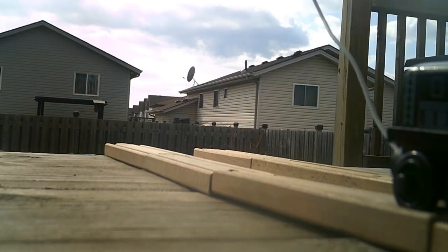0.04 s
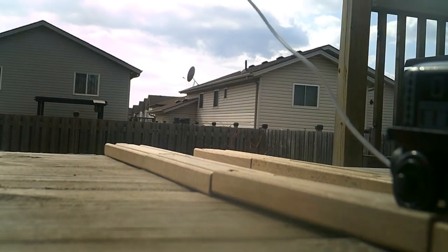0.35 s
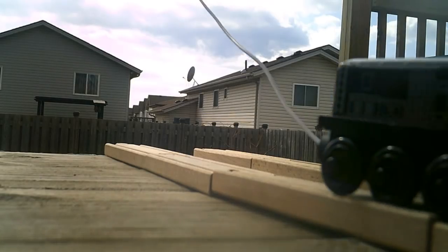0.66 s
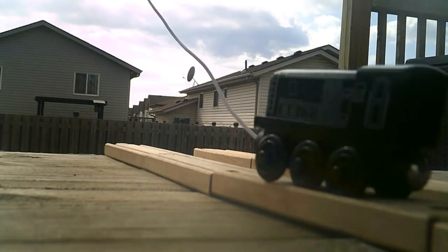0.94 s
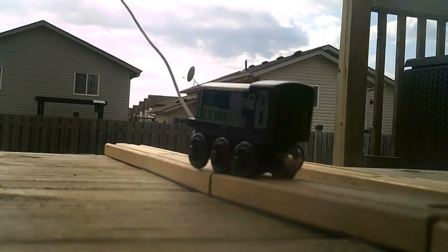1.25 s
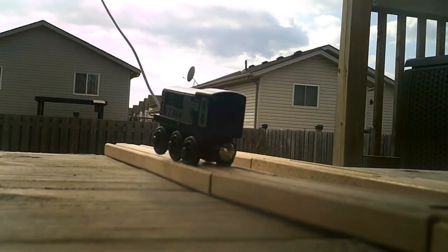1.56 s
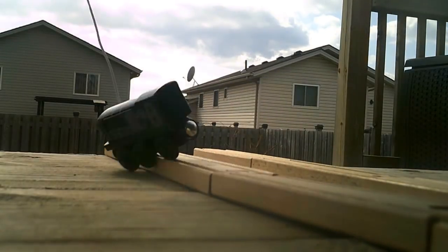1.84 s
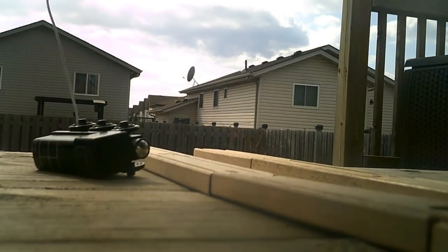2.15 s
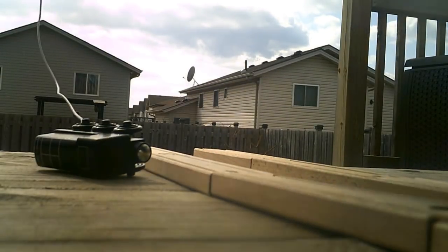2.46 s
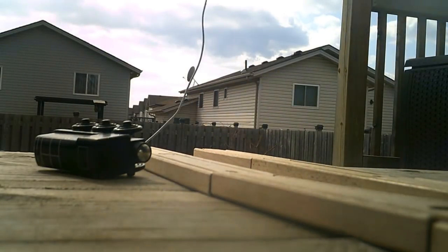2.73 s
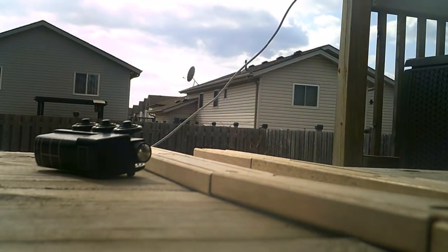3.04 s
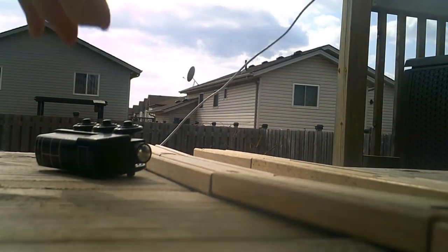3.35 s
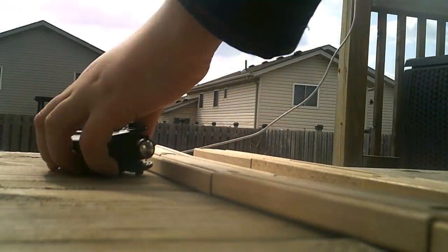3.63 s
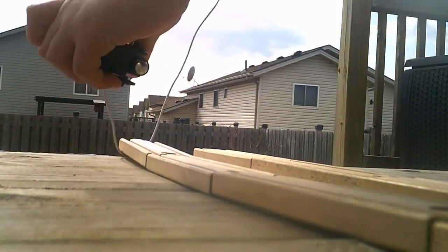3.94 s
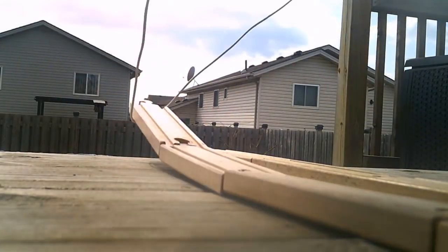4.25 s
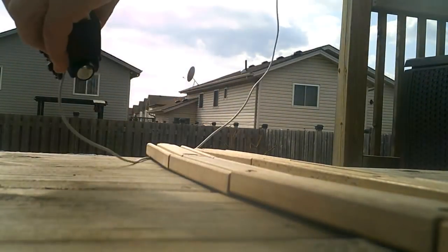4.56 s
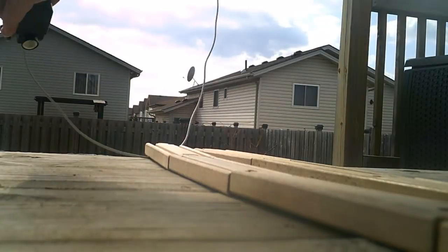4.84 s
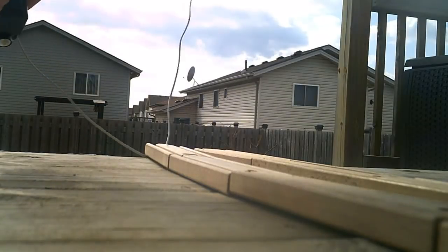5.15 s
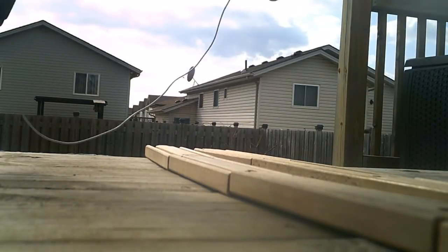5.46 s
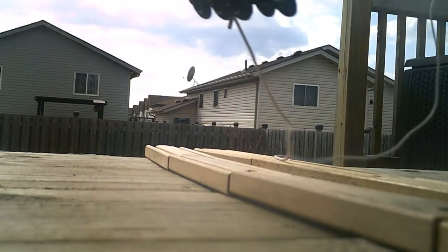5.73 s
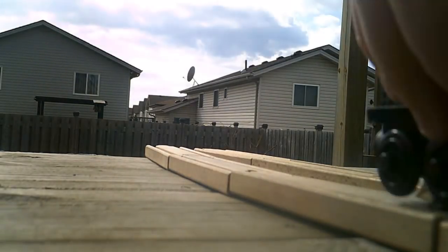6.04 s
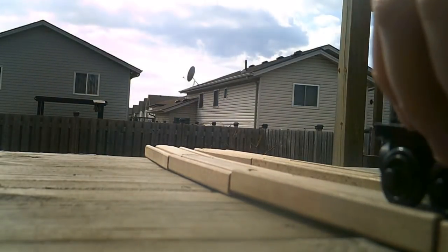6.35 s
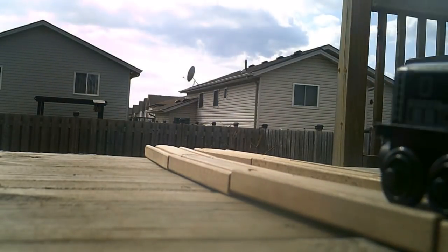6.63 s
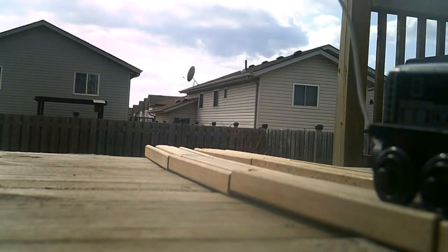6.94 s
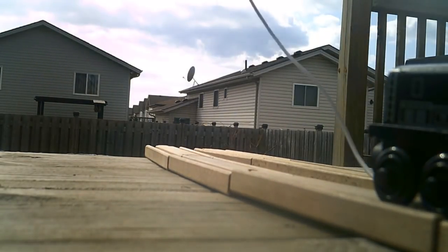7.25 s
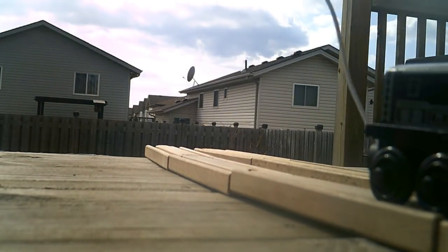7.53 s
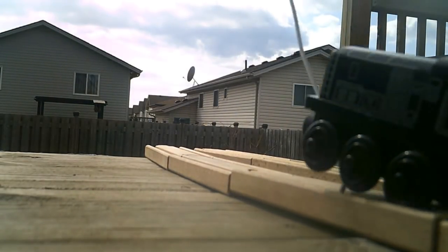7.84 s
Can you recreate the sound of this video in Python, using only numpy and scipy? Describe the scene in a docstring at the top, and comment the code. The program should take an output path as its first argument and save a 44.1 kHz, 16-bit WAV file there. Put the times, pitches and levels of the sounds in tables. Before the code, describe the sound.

Close to a small microphone on a garden deck, toy train wheels rumble and rattle over wooden track. The toy falls with loud, slightly distorted knocks, and a cord groans over an edge. Scattered wooden clacks, rubs and tiny metal clinks follow as it is lifted and put back, and it briefly starts rolling again. Light wind and a low outdoor hum continue underneath.

```python
"""A garden deck, close up on a small camera's microphone, with light wind and a distant murmur.
A wooden toy engine, pulled by a cord, scrapes and rumbles along loose track slats. At two seconds
it tumbles off the end: the boards thud underneath and the hardest knocks overload the microphone.
The cord creaks over an edge, and the engine is picked up while the slats clack back down.
Fingers settle it on the track, and just before the end it is set rolling again."""
import sys
import numpy as np
from scipy import signal
from scipy.fft import rfft, irfft, next_fast_len
from scipy.io import wavfile
from scipy.ndimage import map_coordinates

SR = 44100
rng = np.random.default_rng(int(sys.argv[2]) if len(sys.argv) > 2 else 0)


def wav_record(signal):
    """Record a signal, one row per channel, as 16-bit PCM in the file named by sys.argv[1]."""
    frames = np.transpose(np.atleast_2d(signal))
    bounded = np.clip(frames, -1, 1)
    # unit amplitude maps onto the largest positive 16-bit level
    quanta = np.round(bounded * 32767).astype(np.int16)
    wavfile.write(sys.argv[1], SR, quanta)


N = 352359
TIME = np.arange(N) / SR

# resonances of the engine's hollow body: (frequency [Hz], width [Hz], level [dB])
BODY_MODES = [(1061, 28, 2.5), (1388, 28, -10.5), (1765, 9.1, -12.5), (2160, 97, -21), (2560, 43, -12),
              (3430, 70, -18.5)]
# spectrum of sliding on wood, also of the outdoor rustle: (frequency [Hz], level [dB])
SLIDE_SPECTRUM = [(300, -16), (700, 8.5), (1080, 10), (1300, 0.5), (1800, 4), (2600, -2.5), (3400, -9),
                  (4300, -19.5), (5200, -28), (7000, -38)]
# spectrum of fine hiss: (frequency [Hz], level [dB])
HISS_SPECTRUM = [(2500, -53), (4200, 5.5), (5200, -6), (6700, 10.5), (7800, 6), (8500, -36.5)]


def amp(db):
    """Decibels to gain."""
    return 10 ** (np.asarray(db) / 20)


def unit(x):
    """Scale to rms 1."""
    return x / np.sqrt(np.mean(x ** 2) + 1e-20)


def fade(t, t60):
    """Exponential decay by 60 dB in t60 seconds."""
    return np.exp(-np.log(1000) * t / np.maximum(t60, 1e-3))


def add(track, s, sound):
    """Mix a sound into a track at s seconds."""
    room = track[max(round(s * SR), 0):][:len(sound)]
    room += sound[:len(room)]


def wobble(rate):
    """A smooth random curve with rate knots a second."""
    return map_coordinates(rng.standard_normal(int(N * rate / SR) + 4), [TIME * rate])


def swell(rows):
    """A gain through (time [s], level [dB]) points, dying away outside them."""
    s, db = np.transpose(rows)
    outside = np.abs(TIME - np.clip(TIME, s[0], s[-1]))
    return amp(np.interp(TIME, s, db)) * fade(outside, 0.11)


def filtered(x, response):
    """x through a response given as a function of frequency."""
    size = next_fast_len(len(x) + 4096)
    return irfft(rfft(x, size) * response(np.fft.rfftfreq(size, 1 / SR)), size)[:len(x)]


def softened(x, edge_hz, order):
    """x without its treble above edge_hz."""
    return filtered(x, lambda hz: 1 / (1 + (hz / edge_hz) ** order))


def coloured(x, spectrum):
    """x shaped by a (frequency [Hz], level [dB]) spectrum, at rms 1."""
    f, db = np.transpose(spectrum)
    return unit(filtered(x, lambda hz: amp(np.interp(np.log(hz + 1), np.log(f + 1), db))))


def resonate(x, modes):
    """x through a bank of resonances of alternating sign, at rms 1."""
    def response(f):
        return sum((-1) ** k * amp(db) * 1j * f * width / (hz * hz - f * f + 1j * f * width)
                   for k, (hz, width, db) in enumerate(modes))
    return unit(filtered(x, response))


def noise(spectrum):
    """Steady noise with the given spectrum, at rms 1."""
    return coloured(rng.standard_normal(N), spectrum)


def grains(rate, spread_db):
    """Tiny random contacts of unequal force, rate a second."""
    contacts = (rng.random(N) < rate / SR) * rng.standard_normal(N)
    return unit(contacts * amp(spread_db * rng.standard_normal(N) / 2))


def outdoors(wind_db=-38.5, rustle_db=-61.5, hiss_db=-80):
    """Wind on the microphone, a distant murmur, faint rustle and hiss, and a brief high insect buzz."""
    # spectra of the wind and of the murmur: (frequency [Hz], level [dB])
    wind_spectrum = [(10, -12.5), (25, 2.5), (42, -4), (70, -6.5), (130, -16), (300, -26.5), (900, -96)]
    murmur_spectrum = [(60, -4.5), (180, -1), (400, 4), (600, 3.5), (850, 4), (1120, -5), (1300, -12),
                       (2400, -25), (3500, -24), (4200, -46.5)]
    # rise and fall of the murmur: (time [s], level [dB])
    murmur_levels = [(0, -45.5), (.3, -52), (1.2, -44), (2.3, -46.5), (4.2, -43.5), (4.5, -51), (5.6, -49),
                     (6.45, -43), (7.3, -47.5)]
    gusts = amp(wind_db + 1.9 * wobble(8)) * noise(wind_spectrum)
    murmur_db = np.interp(TIME, *np.transpose(murmur_levels)) + 0.42 * wobble(4.97)
    murmur = amp(murmur_db) * noise(murmur_spectrum)
    rustle = amp(rustle_db) * noise(SLIDE_SPECTRUM) + amp(hiss_db) * noise(HISS_SPECTRUM)
    buzz = noise([(5500, -38.5), (6100, -26), (6550, -24), (7100, -62)])
    return gusts + murmur + rustle + swell([(.18, -69), (.85, -71)]) * buzz


def stroke(s, hold, ramp, ramp_db=28.5, sag_db_per_s=19, release_ratio=1.03):
    """Gain of one sliding stroke: it swells until s, eases off while held, and lets go."""
    before = np.maximum(s - TIME, 0)
    held = np.clip(TIME - s, 0, hold)
    after = np.maximum(TIME - s - hold, 0)
    return amp(-ramp_db * (before + after / release_ratio) / ramp - sag_db_per_s * held)


def rubbing(body_db=-3):
    """Wheel flanks, cord and hand slide on wood: tiny slips rasp and ring in it, with hiss on top."""
    # sliding strokes: (time of full pressure [s], hold [s], ramp [s], level [dB], relative hiss [dB])
    strokes = [(0.0, 0.07, 0.58, -55, -23), (0.802, 0.029, 0.18, -42.5, -18.5),
               (1.193, .06, 0.099, -34.5, -16.5), (1.269, 0.046, 0.11, -24, -21.5),
               (2.451, .17, 0.11, -43, -30), (2.77, 0.037, 0.17, -37, -22),
               (2.853, 0.31, .12, -51.5, -19.5), (3.297, 0.28, 0.09, -46, -22.5),
               (3.887, 0.17, 0.39, -44.5, -20.5), (5.058, 0.2, .12, -50, -27), (5.49, 0.18, 0.83, -56, -41),
               (5.766, 0.049, 0.16, -42.5, -22.5), (5.95, 0.014, 0.067, -44, -21.5),
               (6.479, 0.45, 0.13, -42.5, -23), (7.002, 0.14, 0.044, -37.5, -16.5),
               (7.38, 0.078, 0.21, -44.5, -25.5), (7.603, 0.059, .13, -49.5, -22.5)]
    rub_gain, hiss_gain = np.zeros(N), np.zeros(N)
    for s, hold, ramp, db, hiss_db in strokes:
        pressure = amp(db) * stroke(s, hold, ramp)
        rub_gain = np.maximum(rub_gain, pressure)
        hiss_gain = np.maximum(hiss_gain, amp(hiss_db) * pressure)
    slips = rng.standard_normal(N) * amp(0.87 * wobble(90))
    body = resonate(grains(rate=5300, spread_db=10), BODY_MODES)
    rasp = unit(coloured(slips, SLIDE_SPECTRUM) + amp(body_db) * body)
    return rub_gain * rasp + amp(1) * hiss_gain * noise(HISS_SPECTRUM)


def deck_thuds(t60=0.25, overtone_ratio=1.97, overtone_db=-7, attack_s=0.0057):
    """A deck board bounces in its lowest mode, with a shorter overtone."""
    # heavy pushes on the boards: (time [s], relative level [dB], board pitch [Hz])
    pushes = [(0.004, -19, 42.7), (1.817, -9, 57.8), (1.858, -9.5, 43), (2.7, -21.5, 125), (2.735, -20, 62),
              (2.848, -9.5, 45), (3.44, -6, 41.4), (3.445, -17, 174.6), (3.521, -22.5, 92.4),
              (6.965, -24, 108.5)]
    track, t = np.zeros(N), np.arange(SR // 2) / SR
    for s, db, board_hz in pushes:
        phase = 2 * np.pi * board_hz * t
        overtone = amp(overtone_db) * np.sin(overtone_ratio * phase) * fade(t, 0.12)
        swing = np.sin(phase) * fade(t, t60) + overtone
        add(track, s, -amp(db + 4) * swing * (1 - np.exp(-t / attack_s)))
    return track


def knock(thud_db, crack_db, t60, pitch_hz, focus_db=8, focus_octaves=0.14,
          tail_db=-22, tail_t60=0.45, attack_s=0.00056):
    """One blow on wood: ringing slat modes, a dense burst of overtones, and the deck's longer answer."""
    # modes of slats and deck boards: (frequency [Hz], level [dB], t60 [s])
    slat_modes = [(91.5, -13, 0.99), (174.4, -9, 0.94), (257.3, -2, 0.19), (342.5, -18, 0.28),
                  (437.7, -1, 0.2), (494.5, -6.5, 0.14), (662, -0.5, 0.12), (746, 5.5, 0.07),
                  (902, 0, 0.066), (1045, 1, 0.055), (1104, -7.5, 0.21), (1355, -22, 0.25),
                  (1447, -13, 0.11), (1650, -21, 0.06), (1826, -12.5, 0.075), (2126, -16.5, 0.055),
                  (2415, -23, 0.27), (2516, -29, 0.08), (2590, -22.5, 0.094), (3340, -19, 0.05)]
    # spectrum of the dense overtones: (frequency [Hz], level [dB])
    clack_spectrum = [(60, -45), (170, 5.5), (300, 3.5), (450, -1), (750, -0.5), (1100, -7.5), (1300, -19),
                      (1900, -12), (2700, -21.5), (3600, -36), (4800, -42), (7500, -46)]
    t = np.arange(SR // 3) / SR
    onset = t < .015

    def favour(hz):
        """The place struck favours the modes around one pitch."""
        return amp(focus_db * np.exp(-.5 * (np.log2((hz + 1) / pitch_hz) / focus_octaves) ** 2))

    ring = np.zeros(len(t))
    for hz, db, mode_t60 in slat_modes:
        strength = favour(hz) * amp(db + rng.normal(0, 2.4)) * rng.choice([-1, 1])
        detuned_hz = hz * (1 + rng.normal(0, 0.0044))
        ring += strength * np.sin(2 * np.pi * detuned_hz * t) * fade(t, mode_t60)
    ring *= fade(t, 6 * t60)  # a blow that stays in contact damps the ring
    ring = amp(1) * ring / np.std(ring[onset])
    overtones = coloured(filtered(rng.standard_normal(len(t)), favour), clack_spectrum)
    snap_db = -13 + 1.2 * min(crack_db, -6)  # only hard contacts snap in the treble
    blow = amp(snap_db) * rng.standard_normal(len(t)) * fade(t, 0.016)
    # low overtones outlast high ones
    registers = [(400, "low", thud_db, 1.5), ([400, 1300], "band", 0, 1), (1400, "high", crack_db, .6)]
    for edge_hz, kind, db, stretch in registers:
        decay = fade(t, t60 * stretch) + amp(tail_db) * fade(t, tail_t60 * stretch)
        struck = (ring + 1.88 * overtones * decay) * (1 - np.exp(-t / attack_s))
        band = signal.sosfilt(signal.butter(4, edge_hz, kind, fs=SR, output="sos"), struck)
        blow += amp(db) * band / np.std(band[onset])
    return blow


def taps(t60=0.064, even_hz=634, thud_db_per_octave=30.5):
    """Wheels, fingers and shifting slats tap lightly; the deeper the note, the more the deck thuds."""
    # light contacts: (time [s], level [dB], favoured pitch [Hz], relative crack [dB])
    contacts = [(0.515, -37, 570, -30), (0.546, -40, 620, -13), (0.641, -37.5, 537, -11),
                (1.758, -37.5, 520, -16), (1.815, -31.5, 685, -14.5), (1.931, -40.5, 520, -9.5),
                (2.904, -44, 790, -3), (3.152, -38.5, 647, -12), (3.358, -41.5, 595.4, -8),
                (3.595, -51.5, 425, -29), (3.749, -34.5, 766, -23), (4.012, -45.5, 454, -1.5),
                (4.214, -36, 469.3, -37), (4.686, -43.5, 530, -20), (4.711, -36.5, 670, -25),
                (4.804, -39.5, 633, -21), (4.828, -35.5, 714, -24), (5.0, -38.5, 570, -40),
                (5.792, -41.5, 585, -9), (6.404, -37, 780, -11.5), (7.734, -38.5, 522, -20),
                (7.807, -41, 600, -13), (7.843, -41.5, 930, -0.5)]
    track = np.zeros(N)
    for s, db, pitch_hz, crack_db in contacts:
        thud_db = thud_db_per_octave * np.log2(even_hz / pitch_hz)
        add(track, s, amp(db) * knock(thud_db, crack_db, t60, pitch_hz))
    return track


def rolling():
    """Gain that follows how hard the wheels roll."""
    # two runs along the track, each a list of (time [s], relative level [dB])
    runs = [
        [(0.52, -31), (0.618, -37), (0.648, -27.5), (0.704, -41.5), (0.85, -35.5), (1.192, -29), (1.778, -35.5),
         (1.8, -36)],
        [(7.7, -42), (7.742, -45), (7.758, -36.5), (7.91, -32)],
    ]
    return sum(swell(run) for run in runs)


def wheels(rumble_db=1.7, rattle_db=-26, rough_at_s=1.14, rough_width_s=0.21, rough_db=17):
    """Wheels bump over the grain: the slats rumble and the hollow body rattles."""
    # resonances of the track: (frequency [Hz], width [Hz], level [dB])
    track_modes = [(166.2, 21.3, 0), (259.5, 43.4, 1.5), (375, 36, -9.5), (437, 11, 0.5), (568, 100, -13.5),
                   (721, 75, -10.5)]
    bumps = grains(rate=1100, spread_db=0.5) * amp(3.1 * wobble(40))
    # wood passes only the slow part of each bump, the heavy track less than the light body
    rumble = resonate(softened(bumps, edge_hz=950, order=8), track_modes)
    rattle = resonate(softened(bumps, edge_hz=3000, order=8), BODY_MODES)
    # a rough stretch of track shakes the body harder
    shake_db = rough_db * np.exp(-.5 * ((TIME - rough_at_s) / rough_width_s) ** 2)
    return rolling() * (amp(rumble_db) * rumble + amp(rattle_db + shake_db) * rattle)


def axle_ticks(per_second=36, relative_db=-31, spread_db=2):
    """The axles click softly in their slots at random moments while the wheels turn."""
    # resonances of the slots: (frequency [Hz], width [Hz], level [dB])
    slot_modes = [(1840, 400, -4.5), (2680, 130, -0.5), (3690, 184, -6.5)]
    clicks = (rng.random(N) < per_second / SR) * amp(spread_db * rng.standard_normal(N))
    return amp(relative_db) * rolling() * resonate(softened(clicks, edge_hz=3700, order=16), slot_modes)


def steel_clinks(t60=0.055):
    """Steel axles and coupling magnets touch and ring briefly in clusters of close modes."""
    # steel contacts: (time [s], relative level [dB])
    contacts = [(0.5677, -39.5), (0.6419, -49), (1.5744, -52), (1.7659, -46), (1.9724, -24), (2.016, -29),
                (2.059, -40), (3.447, -16.5), (3.528, -21), (4.239, -33.5), (5.146, -38), (5.176, -34),
                (6.149, -18.5), (6.358, -43), (6.3984, -41), (7.929, -22)]
    # mode clusters: (frequency [Hz], width [Hz], level [dB])
    clusters = [(3660, 130, 0), (2720, 130, -5), (6800, 1500, -18)]
    track, t = np.zeros(N), np.arange(SR // 8) / SR
    for s, db in contacts:
        ring = resonate(rng.standard_normal(len(t)), clusters)
        add(track, s, amp(db - 9) * ring * fade(t, t60))
    return track


def landings(corner_db=-12.5, shortest_s=.005, flight_ratio=0.98, dulling_db=7):
    """Engine and slats land hard: a corner may touch first, and two duller bounces may follow the blow."""
    # landings: (time [s], level [dB], relative thud [dB], relative crack [dB], t60 [s],
    # favoured pitch [Hz], lead of the corner [s], first flight [s], loss at the first bounce [dB])
    blows = [(1.98, -5.5, -10, -14.5, 0.023, 474, .011, .007, 7.5),
             (2.029, -14, -5.5, -6.5, 0.027, 514, .014, .013, 3.5),
             (3.446, -13.5, -7.5, -9, 0.092, 764, 0.0011, 0.0089, 12),
             (3.528, -16.5, -12.5, -4.5, 0.063, 960, 0.01, 0, -3),
             (4.121, -16, -9, -16, 0.046, 606, 0.0061, 0.00062, 0),
             (4.293, -9, -6, -20.5, 0.092, 634, 0.004, .021, 5.5),
             (5.175, -22.5, -16.5, -8.5, 0.092, 970, 0.0012, 0, 0),
             (5.238, -19, -8.5, -12, 0.035, 756, 0.0052, 0.012, 2.5),
             (6.148, -17.5, -1, -10, 0.034, 570, .021, .02, 15.5),
             (6.965, -16, -7, -11.5, .036, 450, 0.00055, 0, 0),
             (7.928, -13, -16, -5, 0.071, 818, 0.0057, 0, 0), (7.966, -18, -9, -7, 0.081, 816, 0, 0, 9)]
    track = np.zeros(N)
    for s, db, thud_db, crack_db, t60, pitch_hz, lead, flight, loss_db in blows:
        add(track, s, amp(db) * knock(thud_db, crack_db, t60, pitch_hz))
        if lead > shortest_s:
            corner = knock(thud_db=5, crack_db=-6.5, t60=0.087, pitch_hz=620)
            add(track, s - lead, amp(db + corner_db) * corner)
        if flight > shortest_s:
            for k in (1, 2):
                s += flight * flight_ratio ** (k - 1)
                bounce = knock(thud_db, crack_db - k * dulling_db, t60=0.1, pitch_hz=pitch_hz)
                add(track, s, amp(db - k ** 1.27 * loss_db) * bounce)
    return track


def cord_creak(jitter=.17, drag=0.56, rasp_db=-20, rasp_db_per_octave=4):
    """The cord sticks and slips over an edge: a groan that sinks and breaks up, and a rasp of fibres."""
    # the pull, slowing to a stop: (time [s], slip rate [1/s], level [dB])
    pull = [(2.292, 264, -44), (2.379, 240, -28.5), (2.469, 177, -26.5), (2.51, 78, -24.5),
            (2.579, 50, -33.5), (2.673, 30, -40)]
    # resonances of the edge and of the taut cord: (frequency [Hz], width [Hz], level [dB])
    edge_modes = [(118, 82, -0.5), (235, 90, -0.5), (465, 100, -9.5), (818, 144, -13)]
    cord_modes = [(1830, 350, 5.5), (2520, 380, 2.5), (3420, 79, -2.5), (4060, 130, -17)]
    s, rates, db = np.transpose(pull)
    slip_rate = np.interp(TIME, s, rates)
    slip_count = np.cumsum(slip_rate * np.exp(jitter * wobble(150))) / SR
    # slower slips store more tension, so each one kicks harder
    kicks = unit(np.diff(np.floor(slip_count), prepend=0) / np.sqrt(slip_rate))
    groan = resonate(kicks + drag * rng.standard_normal(N), edge_modes)
    rasp = resonate(kicks + grains(rate=1800, spread_db=3), cord_modes)
    # the fibres rasp more as the cord slows
    rasp_gain = amp(rasp_db + rasp_db_per_octave * np.log2(np.mean(rates) / slip_rate))
    return swell(np.transpose([s, db])) * (groan + rasp_gain * rasp)


def squeak(db=-45, start_s=3.28, length_s=.1, from_hz=1220, to_hz=1800):
    """A faint, unsteady squeak slides upward."""
    progress = np.clip((TIME - start_s) / length_s, 0, 1)
    pitch_hz = (from_hz + (to_hz - from_hz) * progress ** 2) * (1 + 0.045 * wobble(420))
    envelope = np.sqrt(np.abs(np.sin(np.pi * progress)))
    return amp(db) * envelope * np.sin(2 * np.pi * np.cumsum(pitch_hz) / SR)


def settling_fingers(start_s=6.2, end_s=6.9, per_second=15, db=-44.5, spread_db=2):
    """Fingers settle the engine on the track: faint taps at random moments and places."""
    track = np.zeros(N)
    count = round(per_second * (end_s - start_s))
    times = rng.uniform(start_s, end_s, count)
    for s, (force, place) in zip(times, rng.standard_normal((count, 2))):
        tap = knock(thud_db=-5, crack_db=-15, t60=0.064, pitch_hz=780 * np.exp(0.28 * place))
        add(track, s, amp(db + spread_db * force) * tap)
    return track


def scene():
    """The toy close by and the garden behind it, as they reach the one microphone."""
    blows = landings() + taps() + steel_clinks() + deck_thuds()
    movement = wheels() + axle_ticks() + rubbing() + cord_creak() + squeak()
    return (blows + movement + outdoors() + settling_fingers())[None]


def record(dry, ceiling=0.654, top_hz=7950):
    """The microphone flattens the hardest peaks; the camera keeps nothing above its band limit."""
    clipped = np.clip(dry[0], -ceiling, ceiling)
    return filtered(clipped, lambda hz: 1 / np.sqrt(1 + (hz / top_hz) ** 110))[None]


dry = scene()
out = record(dry)
wav_record(out)
```